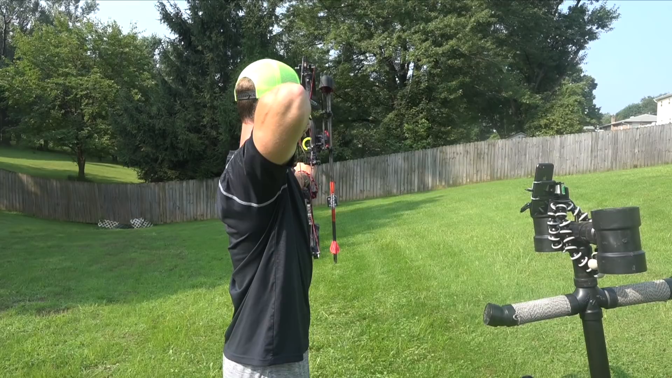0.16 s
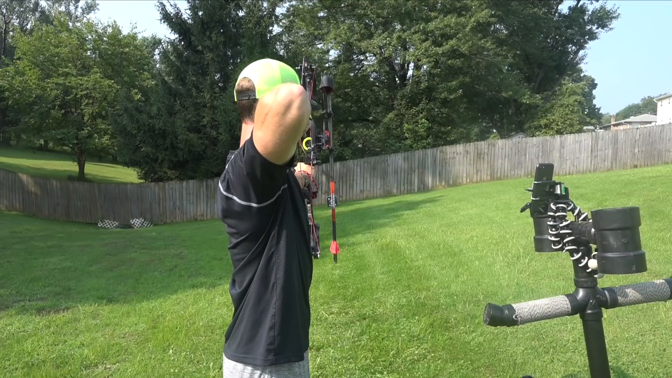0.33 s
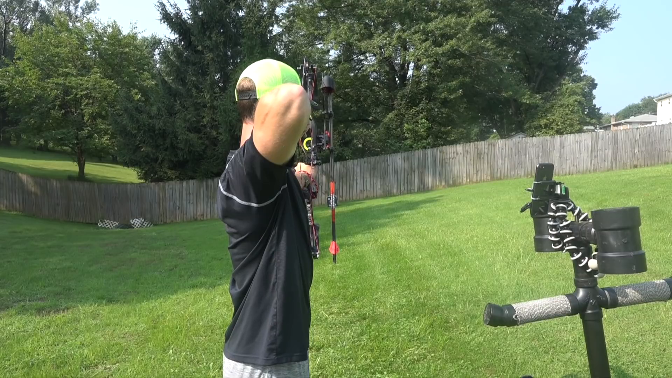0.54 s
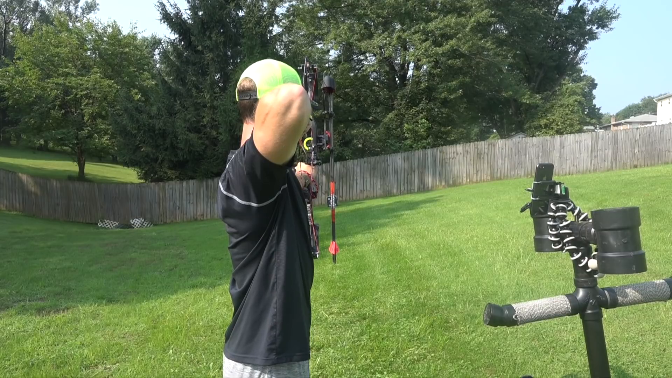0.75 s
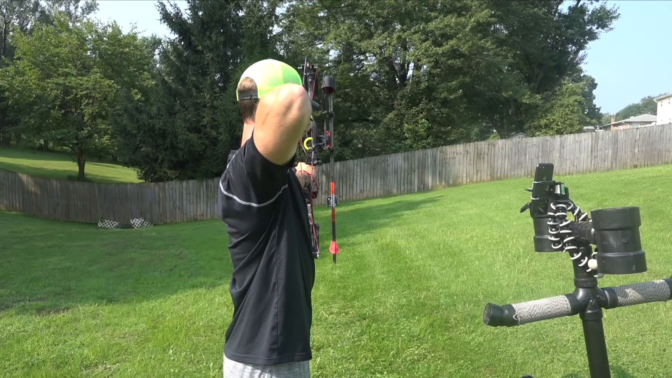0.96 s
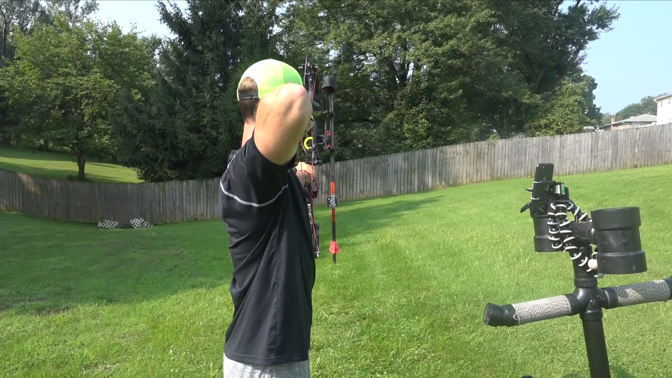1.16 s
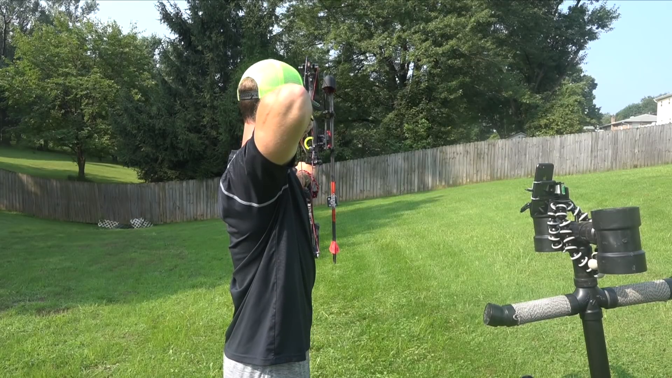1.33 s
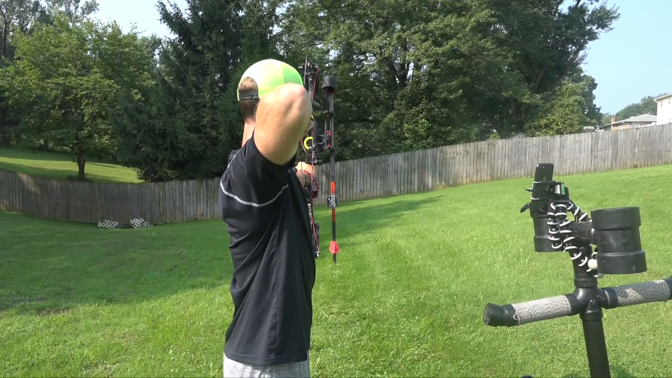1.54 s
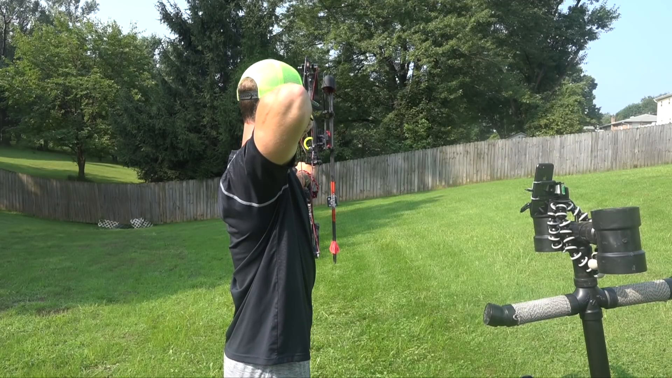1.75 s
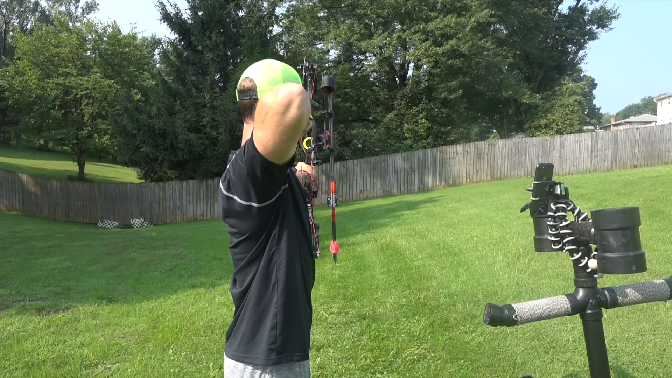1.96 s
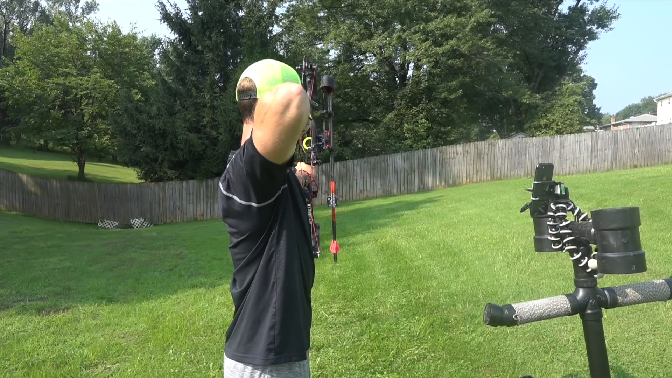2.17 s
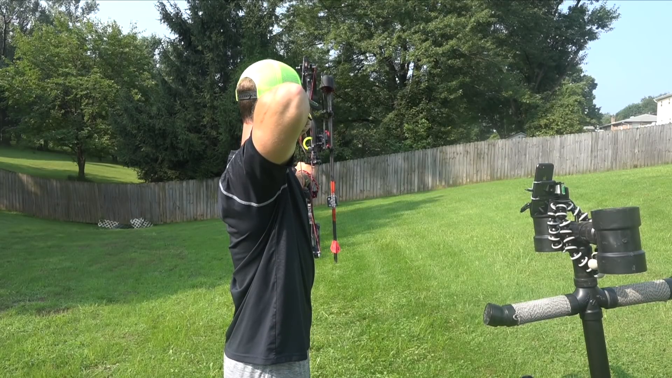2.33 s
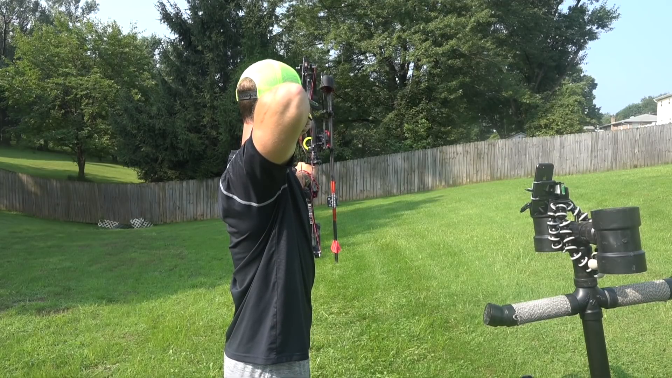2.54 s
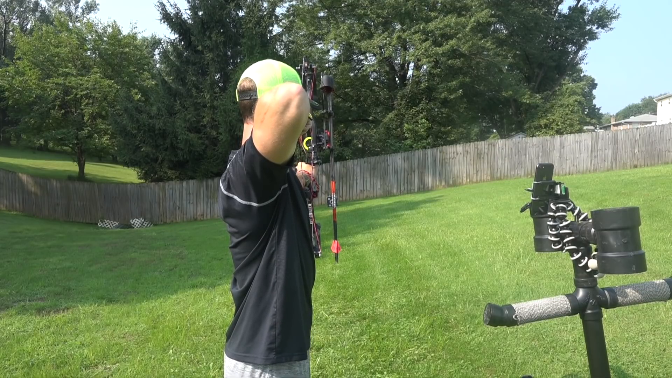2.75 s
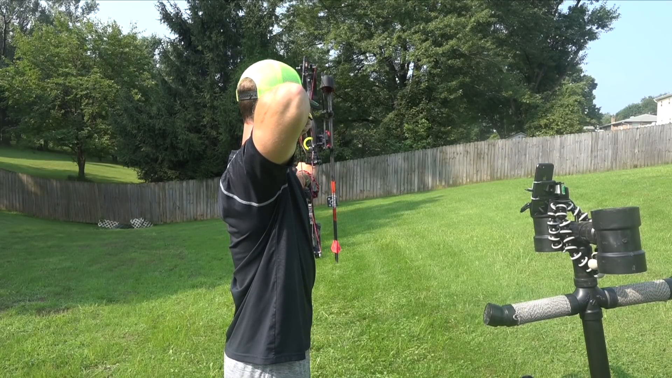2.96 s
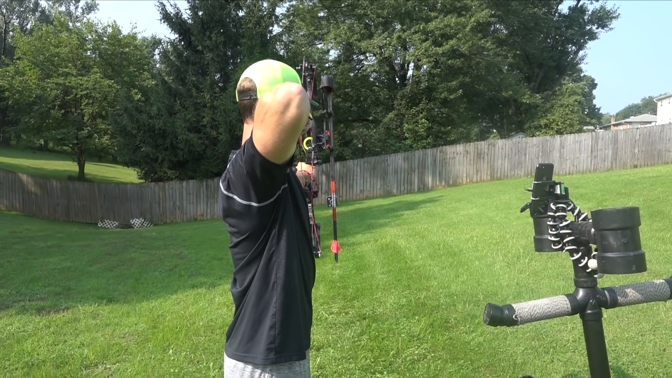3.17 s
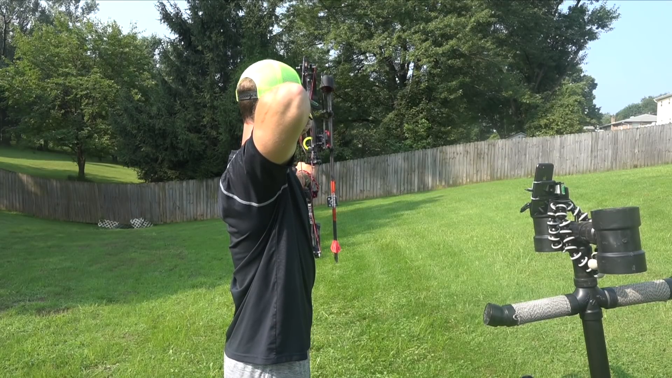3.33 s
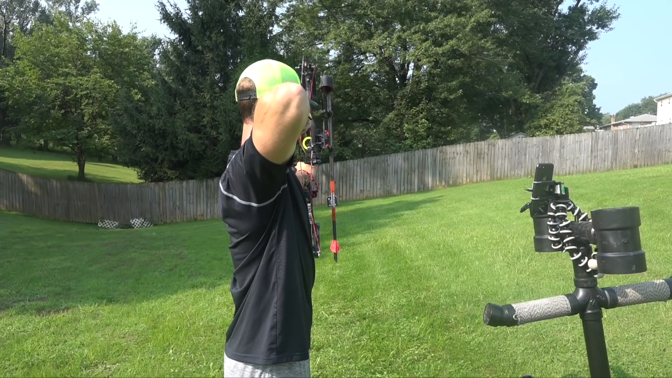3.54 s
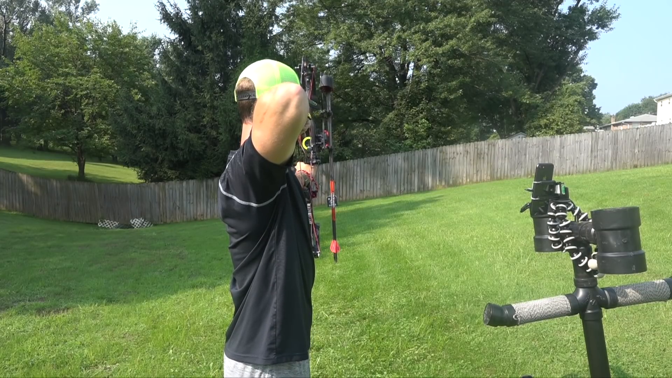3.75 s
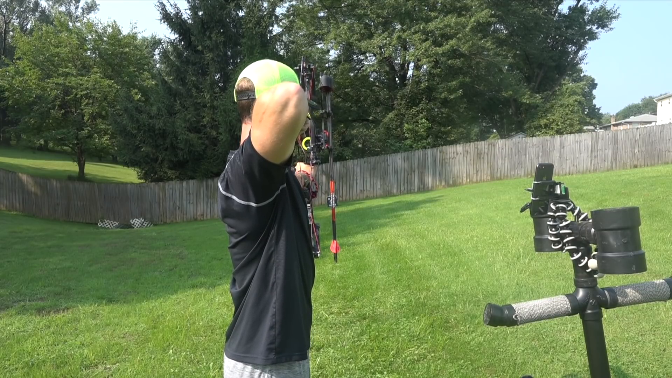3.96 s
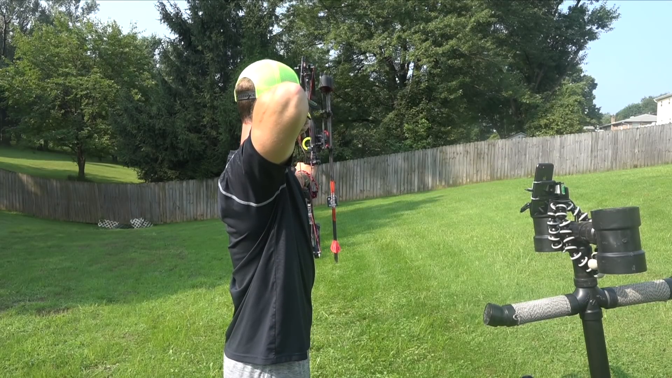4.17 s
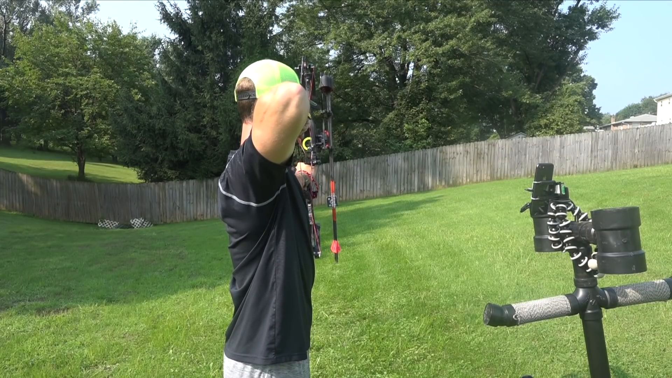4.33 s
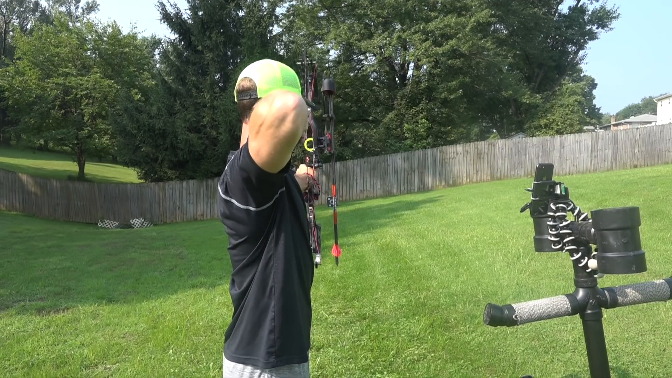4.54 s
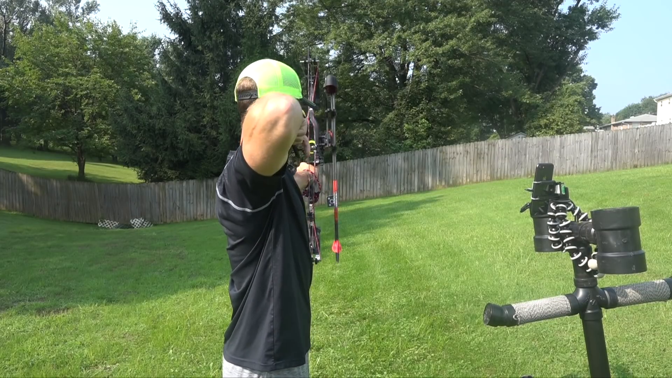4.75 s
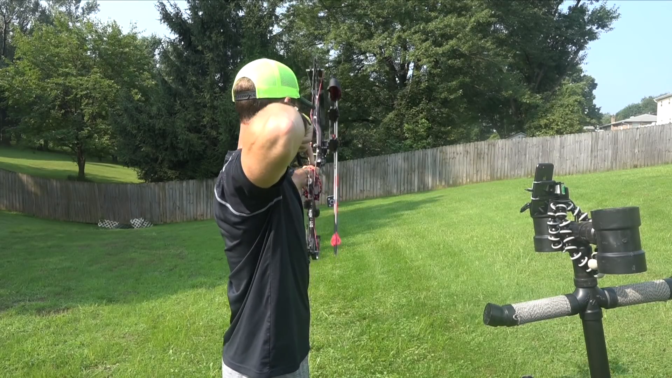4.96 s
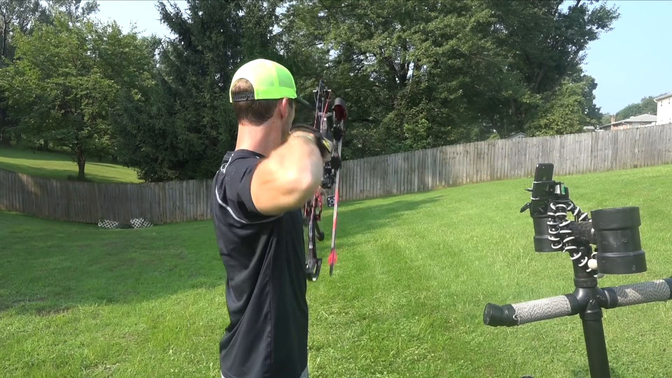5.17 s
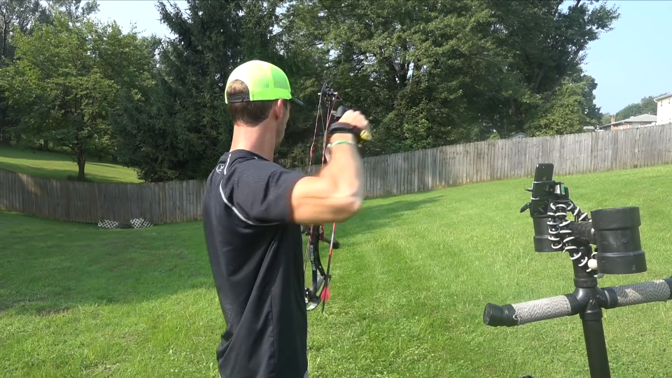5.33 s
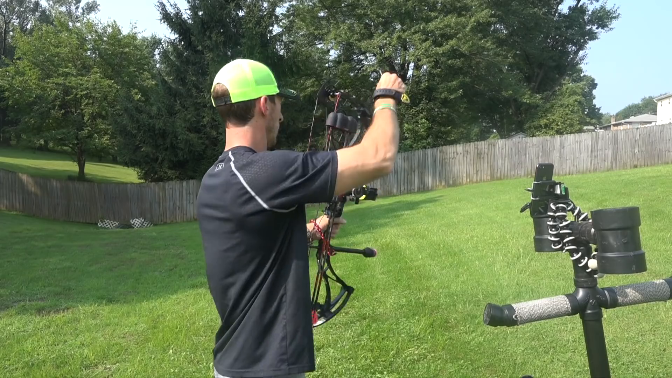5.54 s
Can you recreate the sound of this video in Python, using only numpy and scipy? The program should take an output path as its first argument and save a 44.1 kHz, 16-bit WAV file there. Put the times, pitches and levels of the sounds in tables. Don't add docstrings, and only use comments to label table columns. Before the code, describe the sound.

A backyard ambience heard close to an archer on a stereo microphone. From 0 to 4.4 s, a steady high cicada hiss, a thin cricket trill at about twenty strokes a second, pulsing katydids and rustling leaves lie over low far-traffic rumble and soft engine drones. Wind pushes the microphone in low, dull lumps, strongest in the first second, especially near 0.5, and again around 1.7 and 3 s. Faint bird whistles appear near 0.7, 1.2 and 2.7 s, then pips and falling slurs become frequent from 3 s, clearest around 4.2. At 4.42 s a small release click leads into a loud, sharp string slap at 4.45, with woody limb ring and a quick rattle; one loose tick follows at 4.57. At 4.73 the arrow strikes foam with a solid thud and brief hiss. A faint tree echo lingers. The ducked ambience continues, calmer in wind, with birds until about 5 s and traffic slowly nearing.

```python
import sys
import numpy as np
from scipy import signal
from scipy.fft import rfft, irfft, next_fast_len
from scipy.io import wavfile
from scipy.ndimage import uniform_filter1d, map_coordinates

SR = 44100
rng = np.random.default_rng(int(sys.argv[2]) if len(sys.argv) > 2 else 0)


def master(y):
    cut = np.clip(np.atleast_2d(y).T, -1, 1)
    pcm = np.round(cut * 32767)
    wavfile.write(sys.argv[1], SR, pcm.astype(np.int16))


def field_ratio(decibels):
    return 10 ** (np.asarray(decibels, dtype=float) / 20)


N = 251325

# time in seconds, crack in dB, thump in dB, thump in Hz.
BOW_CONTACTS = [(4.4207, -8, -17, 1500), (4.4233, -8, -7, 1190), (4.4451, 5, -20, 2490),
                (4.4474, -5, 6, 740), (4.4488, 5.5, 0.5, 845), (4.4504, -2, -21, 800),
                (4.4532, -1, -31, 600), (4.4562, -19, -11, 610), (4.4592, -4, -28, 500),
                (4.4607, -11, -34, 396), (4.4657, -7, -25, 400)]
# time in seconds, crack in dB, thump in dB, thump in Hz.
CABLE_BOUNCES = [
    (4.4860, -22, -23, 700),
    (4.4995, -20, -14, 900),
    (4.5682, -12.5, -18, 1900),
]
# time in seconds, crack in dB, thump in dB, thump in Hz.
TARGET_CONTACTS = [
    (4.7295, -2, 8, 770),
    (4.7346, -22, -14, 557),
    (4.7405, -19, 3, 935),
    (4.7427, -5, 1, 760),
    (4.7478, -25, 0, 344),
    (4.7528, -26, -5, 403),
    (4.7590, -28, -11, 250),
]
# time in seconds, crack in dB.
CAM_TICKS = [(4.4627, -8), (4.4698, -13), (4.4727, -15), (4.4754, -19), (4.4771, -17), (4.4798, -18),
             (4.482, -18), (4.4839, -22), (4.486, -19), (4.4888, -13), (4.492, -19), (4.4943, -20),
             (4.5035, -24), (4.5064, -32), (4.513, -30), (4.5145, -31)]
# frequency in Hz, level in dB, t60 in seconds.
LIMB_MODES = [(378, 2.5, 0.23), (719, 9, 0.088), (937, -5.5, 0.2), (4100, -26, 0.23), (5685, -19, 0.15),
              (6000, -9, 0.15), (6460, -33, 0.37), (7440, -3, 0.084), (537, -12.5, 0.41), (238, 2.5, 0.14)]
# frequency in Hz, level in dB, t60 in seconds.
STOP_MODES = [(4500, 1, .012), (6100, -4, .008), (13200, -8, .006), (15000, -9, .005), (205, -8, 0.066),
              (1630, -12, .03)]
# frequency in Hz, level in dB, t60 in seconds.
SHAFT_MODES = [(5300, 1, 0.0057), (6900, -2, .005), (3100, -10, .006), (13500, -14, .004)]
# frequency in Hz, level in dB, t60 in seconds.
BLOCK_MODES = [(157, -33, 0.085), (500, 5, 0.075), (620, -9, 0.097), (807, -2, 0.071)]
# frequency in Hz, density in dB per Hz.
SLAP_SPECTRUM = [(880, -42), (1500, -6), (2880, -4.5), (4340, 3), (6490, -6), (7850, -4), (10300, -7.5),
                 (14900, -11), (16500, -34)]
# frequency in Hz, density in dB per Hz.
TIP_SPECTRUM = [(880, -28), (1500, 2), (3450, -7), (5260, 0.5), (8090, -8.5), (13000, -22), (16500, -30)]
# frequency in Hz, density in dB per Hz.
RATTLE_SPECTRUM = [(88, -46), (150, -5), (371, -4), (723, -3), (830, -17), (972, -1), (1530, -7),
                   (6290, -13.5), (14700, -33), (16500, -59)]
# frequency in Hz, density in dB per Hz.
FOAM_SPECTRUM = [(47, -32), (80, 3), (485, -6), (837, -3), (1030, -20), (2060, -22), (2710, -23),
                 (4210, -30), (12000, -42), (15600, -69), (22000, -120)]
# frequency in Hz, density in dB per Hz.
TICK_SPECTRUM = [(1200, -30), (2500, 4), (5000, 0), (7500, 1), (11000, -9), (16000, -19), (16600, -40)]
# frequency in Hz, density in dB per Hz.
CABLE_SPECTRUM = [(350, -33), (600, 4), (1890, 3), (3120, -8), (4330, 1), (5790, 4), (7940, -15),
                  (14000, -26)]
SLIDE_S, SLIDE_STOP_S = 0.0155, 0.0011

# start in seconds, length in seconds, level in dB.
PIPS = [(3.135, .045, -42), (3.22, .04, -44), (3.285, .055, -43), (3.375, .04, -40), (3.788, .026, -29),
        (3.90, .035, -42), (3.965, .03, -42), (4.02, .035, -42), (4.062, .018, -40), (4.09, .025, -43),
        (4.188, .035, -25), (4.295, .018, -40), (4.32, .035, -39), (4.372, .025, -34), (4.58, .035, -40),
        (4.63, .035, -40), (4.708, .04, -28), (4.84, .03, -42), (4.875, .045, -42), (4.92, .035, -43)]
# start in seconds, length in seconds, from Hz, to Hz, level in dB.
FALLS = [(.752, .018, 3050, 2950, -38), (3.015, .10, 2800, 2500, -43), (3.16, .1, 2540, 2500, -47),
         (3.27, .1, 2540, 2440, -43), (3.432, .04, 2200, 2100, -40), (3.478, .12, 2760, 2390, -40),
         (3.64, .11, 2600, 2370, -48), (3.80, .155, 3300, 2370, -41.5), (3.945, .065, 2400, 2160, -34),
         (3.405, .035, 3300, 2950, -43), (4.385, .035, 3350, 2900, -41), (4.65, .055, 3400, 2620, -41),
         (4.75, .045, 2820, 2550, -38), (4.905, .04, 3350, 2800, -42), (.746, .016, 4000, 3050, -39)]
# start in seconds, length in seconds, from Hz, to Hz, level in dB.
RISES = [(.702, .045, 2900, 3750, -38.5), (.732, .02, 3500, 4250, -37), (.738, .018, 3750, 3850, -36),
         (1.162, .018, 1500, 1700, -39), (1.225, .055, 1620, 1660, -41), (1.235, .045, 1280, 1310, -39),
         (2.735, .025, 3800, 3900, -38), (2.738, .02, 2900, 3800, -39), (2.75, .03, 2550, 2760, -40.5),
         (3.728, .045, 1700, 2150, -37.5), (3.776, .02, 2950, 3420, -31), (4.08, .06, 1400, 1780, -37.5),
         (4.14, .046, 1820, 2100, -33), (4.35, .04, 1450, 1650, -42), (4.40, .02, 1750, 1950, -36),
         (4.665, .028, 1850, 2040, -33), (4.69, .02, 1980, 1950, -40)]
# start in seconds, length in seconds, from Hz, to Hz, level in dB.
HOOKS = [
    (3.172, .108, 3560, 2950, -36),
    (3.26, .08, 3050, 2930, -45),
]
# start in seconds, length in seconds, from Hz, to Hz, level in dB.
DIVES = [
    (4.204, .045, 3360, 2840, -30.5),
    (4.24, .036, 2880, 2460, -38),
    (4.238, .06, 3200, 2600, -43),
]
PIP_HZ, PIP_ARCH_HZ, PIP_SCATTER_HZ = 3400, 60, 25
FALL_BEND, RISE_BEND, HOOK_BEND, DIVE_BEND = 1.45, 1.3, 3.1, 1.05
WAVER_HZ = 17
# time in seconds, strokes made.
CRICKET_STROKES = [(-.158, 0), (1.011, 24), (2.4, 52), (2.602, 56), (3.224, 68), (3.622, 76), (4.032, 84),
                   (4.633, 96), (5.245, 108), (5.845, 120)]

# frequency in Hz, density in dB per Hz.
CICADA_SPECTRUM = [(1760, -14), (3000, -8), (4410, -12), (5780, -3.5), (6500, 3), (7180, -2.5),
                   (7810, -0.5), (8260, -4.5), (8900, -11), (9200, -14), (9900, -9.5), (10400, -44)]
# frequency in Hz, width in Hz, level in dB.
KATYDID_PEAKS = [(3390, 190, 17.5), (4020, 180, 16.5)]
# time in seconds, level in dB.
KATYDID_LEVEL = [(0, -43.5), (3.3, -46.5), (3.9, -53), (4.8, -45.5), (5.2, -62), (5.7, -65)]
# frequency in Hz, density in dB per Hz.
LEAF_SPECTRUM = [(1500, -52), (2200, -29), (3500, 0.5), (5000, 2.5), (6000, 1), (7500, -40)]
CICADA_DB = -35

# frequency in Hz, density in dB per Hz.
TYRE_SPECTRUM = [(150, -1.5), (250, -2.5), (434, -4.5), (598, -6), (920, -2.5), (1040, -3.5), (1270, -5.5),
                 (3500, -25.5), (4550, -58), (7700, -120)]
# time in seconds, level in dB.
TYRE_LEVEL = [(0, -35.5), (1.6, -35), (2.4, -34), (3.2, -33.5), (3.9, -33), (4.4, -32.5), (4.8, -31.5),
              (5.7, -29.5)]
# frequency in Hz, density in dB per Hz.
RUMBLE_SPECTRUM = [(24, -12), (40, -13), (64, -0.5), (107, -4.5), (216, -8), (300, -17), (390, -33),
                   (660, -120)]
# frequency in Hz, width in Hz, level in dB, start in seconds, end in seconds.
ENGINES = [(112, 4.9, -35.5, 0.91, 1.57), (115.7, 4.27, -39.5, 1.88, 4.2), (163.2, 5.12, -41, 1.76, 3.9),
           (224.8, 6.05, -42.5, 1.98, 3.24), (229, 5.4, -48, 3.1, 5.6), (196.7, 6, -46.5, 0.23, 1.82),
           (144.5, 6.85, -37.5, 4, 5.8), (79, 4.2, -42.5, 3.6, 5.3), (940, 18, -44, 5.2, 6.2)]
RUMBLE_DB, RUMBLE_FOLLOWS = -35.5, 0.1

# middle in seconds, level in dB, width in seconds.
GUSTS = [(.05, -17.5, 0.18), (.27, -19, 0.063), (.43, -17.5, 0.065), (.55, -13.5, 0.046), (.72, -20, 0.081),
         (1.11, -30.5, 0.14), (1.38, -22.5, 0.065), (1.71, -16.5, 0.028), (1.84, -33, 0.18),
         (2.16, -42, 0.055), (2.76, -24.5, 0.065), (3.0, -21.5, 0.044), (3.2, -19.5, 0.053),
         (3.41, -27.5, 0.038), (3.609, -22, 0.044), (3.8, -25, 0.14), (4.01, -38, 0.027),
         (4.19, -23.5, 0.076), (4.9, -31, 0.059), (5.26, -31, 0.13)]
# frequency in Hz, density in dB per Hz.
WIND_SPECTRUM = [(1.8, -30), (3.0, 13), (21, 14), (30, -5), (54, -10), (90, -20.5), (120, -16), (200, -120)]
# start in seconds, level in dB, frequency in Hz, length in seconds.
EDDIES = [(0.497, -5, 21.7, 0.093), (0.413, -16, 20, 0.03), (1.675, -16.5, 19.4, 0.12),
          (1.783, -19, 15.1, 0.099), (2.966, -19, 23, 0.096), (4.143, -18, 11.5, 0.2)]
BREEZE_DB, CALM_S, CALM_DB, FLUTTER_DB = -32.5, 4.4, -12, 5

# frequency in Hz, left-right correlation.
PORT_LIKENESS = [(60, 0.84), (130, 1), (290, 0.84), (640, 0.93), (1410, 1), (3100, 0.78), (6820, 0.27),
                 (15000, -0.88)]
# frequency in Hz, left minus right in dB.
PORT_TILT = [(60, 2.5), (110, 1), (200, 2.5), (380, 1.5), (700, -0.5), (1290, 1), (2380, -0.5), (4400, -1),
             (8120, -0.5), (15000, -5)]
# frequency in Hz, t60 in seconds.
YARD_DECAY = [(300, 0.1), (3000, 0.12), (12000, 0.047)]
# frequency in Hz, t60 in seconds.
TREE_DECAY = [(300, 0.62), (1200, 0.27), (2500, 6.2), (4500, 0.71), (12000, 0.25)]
# time in seconds, gain in dB.
RECORDER_GAIN = [(0, -3), (.9, -0.42), (2.4, -0.14), (4.408, -0.5), (4.414, -6.5), (4.6, -10.5),
                 (4.95, -12), (5.3, -10.5), (5.7, -10.5)]
# frequency in Hz, density in dB per Hz.
PREAMP_SPECTRUM = [(9500, -40), (10300, -16), (11000, -14), (11300, -1), (14600, 0), (15600, -2),
                   (15850, -8), (16000, -60)]


def unit(x):
    return x / np.sqrt(np.mean(x ** 2) + 1e-20)


def along(points, hz):
    f, v = np.transpose(points)
    return np.interp(np.log(hz + 1), np.log(f + 1), v)


def curves(rows):
    s, *cols = np.transpose(rows)
    return [np.interp(np.arange(N) / SR, s, c) for c in cols]


def wobble(rate_hz):
    at = np.arange(0, N + 32, 32)
    knots = rng.standard_normal(int(N * rate_hz / SR) + 4)
    return np.interp(np.arange(N), at, map_coordinates(knots, [at * rate_hz / SR]))


def filtered(x, response):
    m = next_fast_len(x.shape[-1] + 8192)
    return irfft(rfft(x, m) * response(np.fft.rfftfreq(m, 1 / SR)), m)[..., :x.shape[-1]]


def peaks(modes):
    return lambda f: sum(field_ratio(db) / (1 + (2 * (f - c) / w) ** 2) for c, w, db in modes)


def slope(spectrum):
    return lambda f: field_ratio(along(spectrum, f))


def add(track, s, sound):
    part = track[..., round(s * SR):][..., :sound.shape[-1]]
    part += sound[..., :part.shape[-1]]


def burst(spectrum, rise_s, t60_s, side_db):
    t = np.arange(SR // 4) / SR
    mid, side = unit(filtered(rng.standard_normal((2, len(t))), slope(spectrum)))
    side = field_ratio(side_db) * side
    return np.array([mid + side, mid - side]) * field_ratio(-60 * t / t60_s) * (1 - np.exp(-t / rise_s))


def ring(modes, rise_s):
    t = np.arange(SR // 3) / SR
    tones = sum(field_ratio(db - 60 * t / t60) * np.sin(2 * np.pi * hz * t) for hz, db, t60 in modes)
    return tones * (1 - np.exp(-t / rise_s))


def contacts(rows, spectrum, crack_t60_s, cycles, sign):
    out = np.zeros((2, N))
    t = np.arange(SR // 20) / SR
    for s, crack_db, thump_db, hz in rows:
        crack = burst(spectrum, rise_s=.00008, t60_s=crack_t60_s, side_db=-31)
        add(out, s, field_ratio(crack_db) * crack)
        add(out, s, sign * field_ratio(thump_db - 60 * t * hz / cycles) * np.sin(2 * np.pi * hz * t))
    return out


def bow():
    out = contacts(BOW_CONTACTS, SLAP_SPECTRUM, crack_t60_s=.0035, cycles=4.5, sign=1)
    out += contacts(CABLE_BOUNCES, CABLE_SPECTRUM, crack_t60_s=0.021, cycles=3.6, sign=0.9)
    for s, crack_db in CAM_TICKS:
        add(out, s, field_ratio(crack_db) * burst(TICK_SPECTRUM, rise_s=.0001, t60_s=0.0083, side_db=-14))
    add(out, 4.4475, field_ratio(-12.0) * ring(LIMB_MODES, rise_s=0.0089))
    for s in 4.4474, 4.4489:
        add(out, s, field_ratio(-6.5) * ring(STOP_MODES, rise_s=.0001))
    add(out, 4.4465, field_ratio(-9.0) * burst(RATTLE_SPECTRUM, rise_s=0.002, t60_s=0.19, side_db=-44))
    add(out, 4.4452, field_ratio(-5.5) * burst(SLAP_SPECTRUM, rise_s=0.0012, t60_s=.05, side_db=-18))
    add(out, 4.4215, field_ratio(-18) * burst(SLAP_SPECTRUM, rise_s=0.00068, t60_s=0.045, side_db=-18))
    add(out, 4.438, field_ratio(-8.0) * burst(SLAP_SPECTRUM, rise_s=0.013, t60_s=0.089, side_db=-5))
    add(out, 4.563, field_ratio(-29) * burst(CABLE_SPECTRUM, rise_s=0.0048, t60_s=0.21, side_db=-20))
    return out


def target():
    out = contacts(TARGET_CONTACTS, TIP_SPECTRUM, crack_t60_s=.004, cycles=5.5, sign=-1)
    add(out, 4.73, field_ratio(-10.5) * burst(FOAM_SPECTRUM, rise_s=0.0047, t60_s=0.13, side_db=-22))
    add(out, 4.7295, field_ratio(-0.5) * ring(SHAFT_MODES, rise_s=.0001))
    add(out, 4.7336, field_ratio(-13.0) * ring(BLOCK_MODES, rise_s=0.00065))
    face_spring = [(4.7337, -24, 4, 620)]
    out += contacts(face_spring, TIP_SPECTRUM, crack_t60_s=.004, cycles=3.1, sign=0.94)
    halt = np.clip((SLIDE_S - np.arange(SR // 4) / SR) / SLIDE_STOP_S, 0, 1)
    slide = burst(TIP_SPECTRUM, rise_s=0.00089, t60_s=0.25, side_db=-17)
    add(out, 4.7305, field_ratio(-19) * halt * slide)
    return out


def scattered(x, decay):
    hz, t, z = signal.stft(rng.standard_normal((2, SR)), SR, nperseg=256)
    tail = signal.istft(z * field_ratio(-60 * t / along(decay, hz)[:, None]), SR, nperseg=256)[1]
    return signal.fftconvolve(x[None], tail / np.linalg.norm(tail[0]), axes=1)[:, :N]


def whistle(pitch_hz, db, peak):
    u = np.linspace(0, 1, len(pitch_hz))
    waver = unit(uniform_filter1d(rng.standard_normal(len(u)), size=SR // 150))
    phase = 2 * np.pi * np.cumsum(pitch_hz + WAVER_HZ * waver) / SR
    return field_ratio(db) * np.sin(np.pi * u ** peak) ** .55 * np.sin(phase)


def birds():
    out = np.zeros(N)
    for (start, length, db), chance in zip(PIPS, rng.standard_normal(len(PIPS))):
        u = np.linspace(-1, 1, round(length * SR))
        pitch_hz = PIP_HZ + PIP_SCATTER_HZ * chance - PIP_ARCH_HZ * (u - .2) ** 2
        add(out, start, whistle(pitch_hz, db, peak=.8))
    songs = (FALLS, FALL_BEND, .75), (RISES, RISE_BEND, 1.4), (HOOKS, HOOK_BEND, .75), (DIVES, DIVE_BEND, .7)
    for rows, bend, peak in songs:
        for start, length, from_hz, to_hz, db in rows:
            left = np.linspace(1, 0, round(length * SR))
            add(out, start, whistle(to_hz + (from_hz - to_hz) * left ** bend, db, peak))
    out = out * field_ratio(.9 * wobble(50))
    return out * field_ratio([[-.3], [.3]]) + field_ratio(-6.5) * scattered(out, YARD_DECAY)


def cricket():
    count = curves(CRICKET_STROKES)[0] + .5
    u = np.clip((count % 1 - .515) / 0.19, -1, 1)
    size_db = 0.81 * rng.standard_normal(200)[count.astype(int)]
    pitch_hz = 8810 - 230 * (u + .2) ** 2 * (1 + .45 * u) + 12 * wobble(4)
    envelope = (1 - u ** 2) ** 0.48 * (1 - 0.066 * u)
    song = envelope * np.sin(2 * np.pi * np.cumsum(pitch_hz) / SR)
    return field_ratio(-36.0 + size_db) * song * field_ratio([[-.9], [.9]])


def rush(response, patchy_db, alike=PORT_LIKENESS):
    z = signal.stft(rng.standard_normal((2, N + 512)), nperseg=512)[2]
    field = uniform_filter1d(uniform_filter1d(rng.standard_normal(z.shape[1:]), 5, 0), 12, 1)
    pair = signal.istft(z * field_ratio(patchy_db * unit(field)), nperseg=512)[1][:, :N]

    def mid_side(hz):
        turn = np.arccos(np.clip(along(alike, hz), -1, 1)) / 2
        return response(hz) * [np.cos(turn), np.sin(turn)]

    mid, side = filtered(pair, mid_side)
    return unit(np.array([mid + side, mid - side]))


def wind():
    now = np.arange(N) / SR
    calm_db = CALM_DB * np.clip((now - CALM_S) / .15, 0, 1)
    push = field_ratio(BREEZE_DB + calm_db + FLUTTER_DB * wobble(14))
    for s, db, width in GUSTS:
        near = slice(max(round((s - 3 * width) * SR), 0), round((s + 3 * width) * SR))
        push[near] += field_ratio(db) * np.exp(-((now[near] - s) / width) ** 2)
    out = push * field_ratio([[-3.5], [2.5]]) * rush(slope(WIND_SPECTRUM), patchy_db=1.7, alike=[(10, 0.25)])
    for s, db, hz, length in EDDIES:
        t = np.arange(round(length * SR)) / SR
        swell = np.sin(np.pi * t / length) ** 2
        add(out, s, -field_ratio(db + np.array([[-7], [0]])) * swell * np.sin(2 * np.pi * hz * t))
    return out


def throb(rate_hz, drift, depth):
    return 1 + depth * np.sin(2 * np.pi * np.cumsum(rate_hz * (1 + drift * wobble(1.54))) / SR)


def insects():
    katydid_db = curves(KATYDID_LEVEL)[0]
    out = field_ratio(CICADA_DB + 0.13 * wobble(5.5)) * rush(slope(CICADA_SPECTRUM), patchy_db=0.8)
    chorus = throb(12.1, drift=.05, depth=.4) * rush(peaks(KATYDID_PEAKS), patchy_db=2.5)
    out += field_ratio(katydid_db - 1.5) * chorus
    out += field_ratio(katydid_db + 3.5) * rush(slope(LEAF_SPECTRUM), patchy_db=1.1)
    pulser = throb(12, drift=0.075, depth=1.0) ** 2 * rush(peaks([(5322, 120, 0)]), patchy_db=-2.0)
    out += field_ratio(katydid_db - 12.5) * pulser
    beat = 2 * np.pi * 5.88 * (np.arange(N) / SR - 4.96) + .25 * wobble(1.5)
    buzz = throb(150, drift=.02, depth=.5) * (1 + .75 * np.cos(2 * beat)) * (1 + .45 * np.cos(beat))
    buzz_spectrum = [(8900, -36), (9150, -0.5), (9850, -12.0), (10200, -13.0), (11000, -14.0), (11500, -50)]
    return out + field_ratio(CICADA_DB - 18.5) * buzz * rush(slope(buzz_spectrum), patchy_db=-4.0)


def road():
    tyre_db = curves(TYRE_LEVEL)[0]
    rumble_db = RUMBLE_DB + RUMBLE_FOLLOWS * (tyre_db - tyre_db.mean())
    out = field_ratio(rumble_db + 0.81 * wobble(2.37)) * rush(slope(RUMBLE_SPECTRUM), patchy_db=0.9)
    out += field_ratio(tyre_db + .8 * wobble(3)) * rush(slope(TYRE_SPECTRUM), patchy_db=1.1)
    t = np.arange(N) / SR
    for hz, width_hz, db, start, end in ENGINES:
        turns = np.cumsum(hz + width_hz * wobble(9) / 2) / SR
        fade = np.clip(np.minimum(t - start, end - t) / 0.123, 0, 1)
        out += field_ratio(db + 0.5 + 2.0 * wobble(3.48)) * fade * np.sin(2 * np.pi * turns)
    return out


def air():
    return filtered(road() + insects(), lambda hz: field_ratio(np.outer([.5, -.5], along(PORT_TILT, hz))))


def scene():
    shot = bow() + target()
    echo = np.roll(scattered(shot.mean(0), TREE_DECAY), round(.06 * SR), axis=1)
    return shot + field_ratio(-27.5) * echo + birds() + cricket() + air() + wind()


def top_cut(x):
    return signal.sosfilt(signal.butter(12, 16650, fs=SR, output="sos"), x)


def record(dry):
    gain_db = curves(RECORDER_GAIN)[0]
    hiss = rush(slope(PREAMP_SPECTRUM), patchy_db=1.0, alike=[(10, .05)])
    x = dry * field_ratio(gain_db) + field_ratio(-53.5 + 0.75 * gain_db) * hiss
    limited = x / (1 + np.abs(x / 1.05) ** 6) ** (1 / 6)
    finished = filtered(limited, lambda hz: hz < 16600)
    return top_cut(finished)


dry = scene()
out = record(dry)
master(out)
```